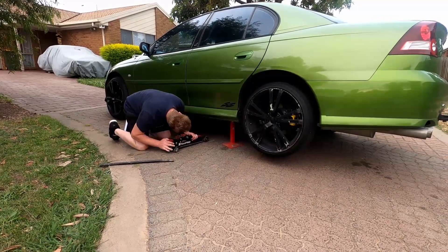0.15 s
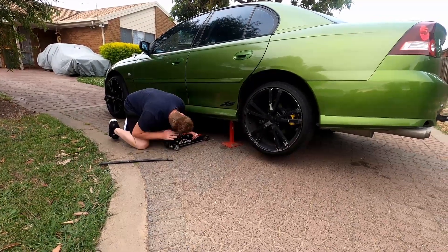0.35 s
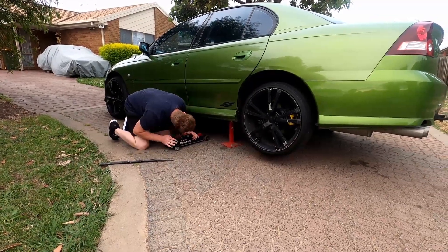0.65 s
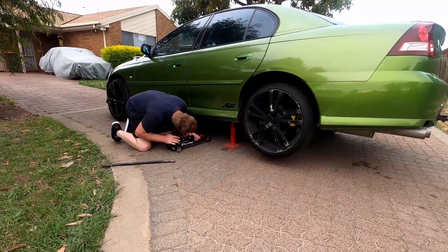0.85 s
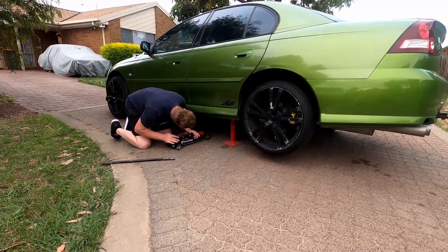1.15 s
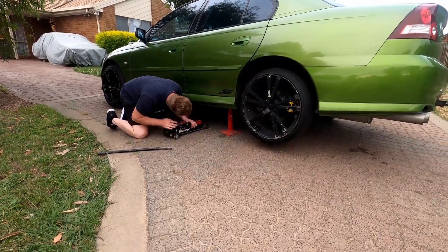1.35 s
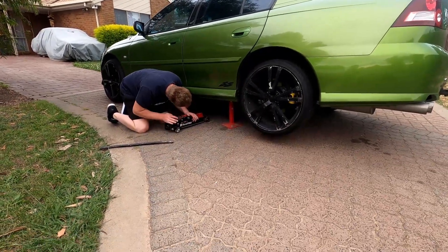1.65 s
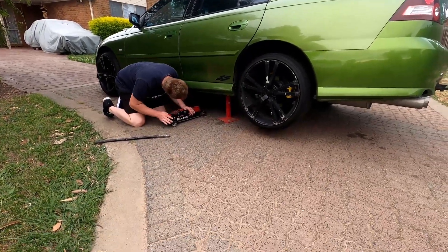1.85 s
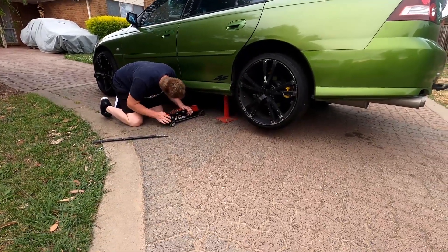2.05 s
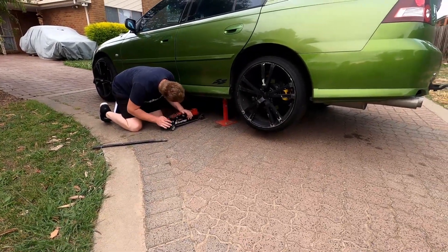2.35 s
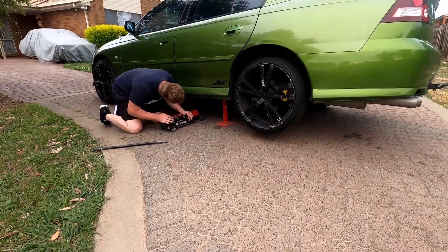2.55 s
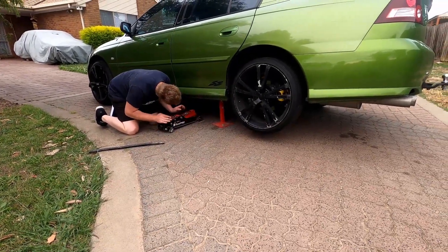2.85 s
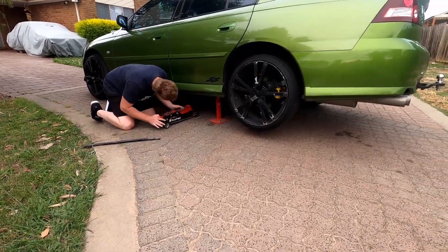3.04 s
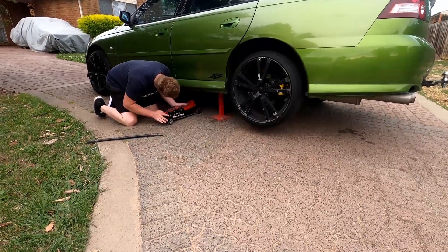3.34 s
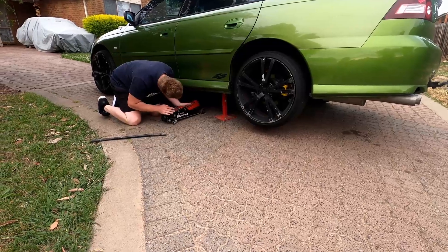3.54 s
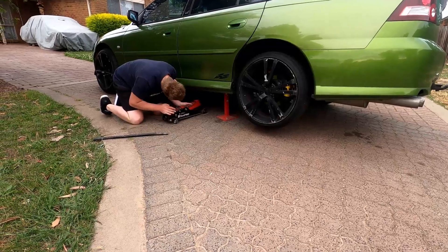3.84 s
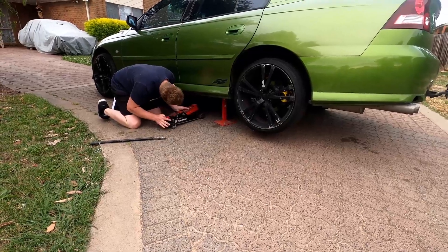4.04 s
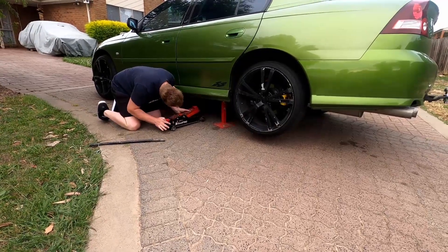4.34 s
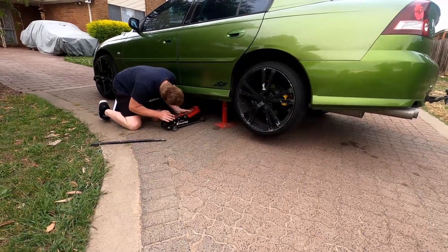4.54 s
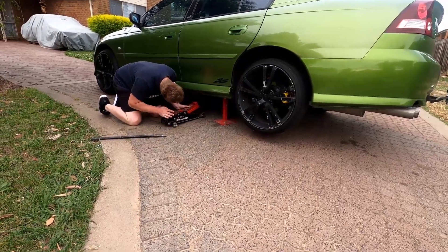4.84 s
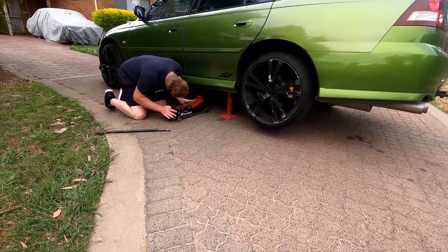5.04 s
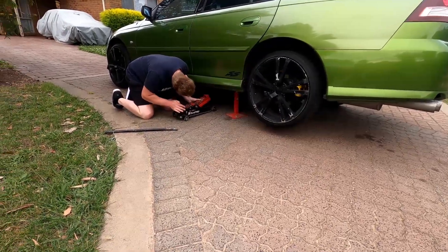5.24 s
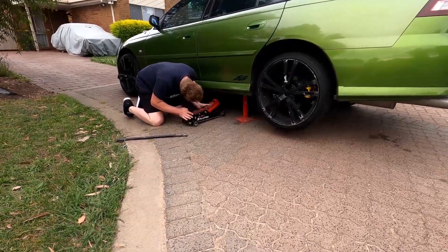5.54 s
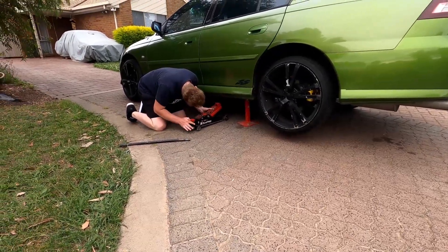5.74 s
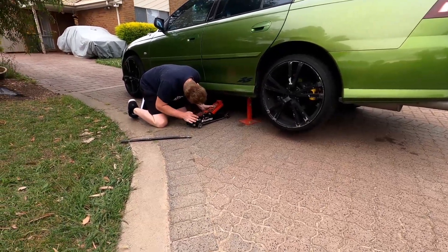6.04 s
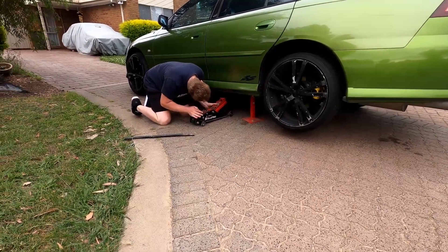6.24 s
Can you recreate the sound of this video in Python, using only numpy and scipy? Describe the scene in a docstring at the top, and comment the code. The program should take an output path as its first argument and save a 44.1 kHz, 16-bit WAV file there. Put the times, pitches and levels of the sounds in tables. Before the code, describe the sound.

Quick metallic knocks and light clicks from a hand-pumped car jack on a driveway, over faint low thumps and air.

```python
"""A paved driveway, beside a car: a small trolley jack is pumped by hand in quick short strokes.
The steel lever knocks at the end of its travel and its loose pins tick in between; the steel rings,
the joints rub and the pump squeaks, amid short gritty scrapes. Paving, car and house throw the sound back.
Underneath lie a few soft low thumps, an engine far off sinking in pitch, and light air on the microphone.
"""
import sys
import numpy as np
from scipy import signal
from scipy.fft import rfft, irfft
from scipy.io import wavfile
from scipy.ndimage import uniform_filter1d

SR = 44100
rng = np.random.default_rng(int(sys.argv[2]) if len(sys.argv) > 2 else 0)


def generate_wav(signal):
    """Clip the signal to [-1, 1] and save it as 16-bit WAV at the path in sys.argv[1]."""
    frames = np.transpose(np.atleast_2d(signal))
    scaled = np.clip(frames, -1, 1) * 32767
    pcm = np.round(scaled).astype(np.int16)
    wavfile.write(sys.argv[1], SR, pcm)


N = 281799
TIME = np.arange(N) / SR


def from_db(db):
    """Decibels to gain."""
    return 10 ** (np.asarray(db) / 20)


def unit(x):
    """Scales to rms 1."""
    return x / np.sqrt(np.mean(x ** 2) + 1e-20)


def read(points, hz, column=1):
    """One column of a table on a log-frequency axis."""
    table = np.transpose(points)
    return np.interp(np.log(hz + 1e-6), np.log(table[0] + 1e-6), table[column])


def add(mix, start, sound):
    """Mixes a sound in at a start time in seconds."""
    part = mix[max(round(start * SR), 0):][:len(sound)]
    part += sound[:len(part)]


def coloured(x, colour):
    """Filters by a (frequency, level) curve and scales to rms 1."""
    return unit(irfft(rfft(x) * from_db(read(colour, np.fft.rfftfreq(len(x), 1 / SR))), len(x)))


def noise(colour, size=N):
    """Noise of rms 1 with the given spectrum."""
    return coloured(rng.standard_normal(size), colour)


def crackle(per_s, spread_db, cap):
    """Sparse random impulses, each boosted by up to cap times spread_db."""
    strength = rng.standard_normal(N) * from_db(spread_db * np.minimum(rng.exponential(1, N), cap))
    return strength * (rng.random(N) < per_s / SR)


def wander(per_s):
    """Random drift of rms 1 that heads for a new value per_s times a second."""
    return unit(np.interp(TIME * per_s, np.arange(2000), rng.standard_normal(2000)))


def swells(rows):
    """Gain over time of smooth swells, each (middle, length, level)."""
    return sum(from_db(db) * np.cos(np.pi * np.clip((TIME - middle) / length, -.5, .5)) ** 2
               for middle, length, db in rows)


def mode(t, hz, t60):
    """A sine that dies by 60 dB in t60 seconds."""
    return np.sin(2 * np.pi * hz * t) * np.exp(-np.log(1000) * t / t60)


def causal(db):
    """Frequency response with this gain that rings only after the blow."""
    log_gain = np.log(from_db(np.r_[db, db[-2:0:-1]]))
    return np.exp(np.conj(signal.hilbert(log_gain)))[:len(db)]


# hush around the driveway, and wind rumble at the microphone: (frequency [Hz], relative level [dB])
HUSH_COLOUR = [(29, -59), (50, 9.5), (70, -4.5), (119, -2), (313, -7), (615, -12.5), (863, -9), (1020, -15),
               (2010, -15.5), (2560, -24), (5150, -26.5), (7570, -27), (9870, -30), (11700, -31),
               (16000, -72)]
RUMBLE_COLOUR = [(8, -4), (16, -28), (28, -7), (45, -15.5), (80, -27), (200, -31), (600, -65)]
# gusts on the microphone: (middle [s], length [s], level [dB])
GUSTS = [(.4, 0.84, -33.5), (1.05, 0.88, -16.5), (1.55, 0.6, -25.5), (2.35, 0.34, -33), (3.1, 0.39, -26.5),
         (3.7, 0.37, -30.5), (4.27, 0.44, -28.5), (4.64, 0.29, -27)]

def open_air(breeze_db=-31.5, sink_db_per_s=0.8, rumble_db=-54.5, hush_db=-58.5):
    """Steady outdoor hush; gusts over a dying breeze sway and rumble at the microphone."""
    wind = from_db(breeze_db - sink_db_per_s * TIME) + swells(GUSTS)
    sway_hz = 4.5 + 2.5 * np.tanh(uniform_filter1d(wander(per_s=6), size=4000))
    sway = wind * np.sin(2 * np.pi * np.cumsum(sway_hz) / SR)
    rumble = from_db(rumble_db) * (wind / from_db(breeze_db)) ** 0.7 * noise(RUMBLE_COLOUR)
    return sway + rumble + from_db(hush_db) * noise(HUSH_COLOUR)


# the far engine's fundamental, as heard from the driveway: (time [s], level [dB])
ENGINE_LEVEL = [(0, -54.5), (.3, -57.5), (.7, -64), (1.4, -53), (2.1, -56), (3.05, -59), (3.7, -67.5),
                (4.4, -64), (5.9, -70.5), (6.39, -71)]

def far_engine(start_hz=144.5, sag_octaves_per_s=.069, octave_db=-72, half_order_db=-17, waver_db=0.9):
    """A far engine slowly winds down; uneven firing adds a weak half order."""
    level_db = np.interp(TIME, *np.transpose(ENGINE_LEVEL))
    phase = 2 * np.pi * np.cumsum(start_hz * 2 ** (-sag_octaves_per_s * TIME)) / SR
    orders = [(1, level_db), (3 / 2, level_db + half_order_db), (2, octave_db)]
    waver = [(1, 0), (6, -4), (30, -40), (100, -100)]  # (frequency [Hz], relative level [dB])
    return np.sqrt(2) * sum(from_db(db + waver_db * noise(waver)) * np.sin(k * phase) for k, db in orders)


# soft low thumps under the work: (time [s], level [dB], pitch [Hz], t60 [s])
THUMPS = [(.235, -43, 93.6, 0.27), (2.269, -60, 57.4, .3), (2.7, -42.5, 66.3, 0.23), (3.639, -40, 61, 0.54),
          (3.974, -43, 60.3, 0.65), (4.771, -38.5, 55.5, 0.57), (5.23, -40.5, 54.6, 0.73),
          (6.161, -42.5, 50.4, 0.4), (6.191, -42, 107.7, 0.41), (6.282, -51, 67, 0.66)]

def thumps(rise_s=0.021, puff_db=-5, puff_decay_s=0.043):
    """A dull push, then a low ring."""
    out, t = np.zeros(N), np.arange(SR) / SR
    puff_colour = [(20, -6), (60, 24), (130, -0.5), (300, -43), (900, -62)]
    for start, db, hz, t60 in THUMPS:
        puff = from_db(puff_db) * noise(puff_colour, size=SR) * np.exp(-t / puff_decay_s)
        add(out, start, from_db(db) * (mode(t, hz, t60) + puff) * (1 - np.exp(-t / rise_s)))
    return out


# the driveway's open-air tail: (frequency [Hz], t60 [s], level [dB])
TAIL = [(193, 0.26, -26), (493, 0.37, 1), (855, 0.093, -2.5), (1440, 0.14, -14.5), (3480, 0.2, -6),
        (6650, 0.16, -8), (10500, 0.097, -18), (15600, 0.11, -26)]
# close reflections off paving and car: (delay [s], level [dB])
ECHOES = [(.0062, -18), (.0105, -15), (0.017, -26), (.0195, -20.5), (.0315, -25.5)]

def driveway(x, build_s=0.0012, size=16384):
    """A few close reflections, smeared by rough surfaces, and a short open-air tail."""
    hz, t, tail = signal.stft(rng.standard_normal(size), SR, nperseg=256)
    decay_s = read(TAIL, hz)[:, None] / np.log(1000)
    tail *= from_db(read(TAIL, hz, column=2))[:, None] * np.exp(-t / decay_s) * np.sqrt(2 / (decay_s * SR))
    response = signal.istft(tail, SR, nperseg=256)[1][:size]
    response *= 1 - np.exp(-np.arange(size) / SR / build_s)
    for delay, db in ECHOES:
        scatter = rng.standard_normal(96) * np.hanning(96)
        add(response, delay, from_db(db) * scatter / np.linalg.norm(scatter))
    return signal.fftconvolve(x, response)[:N]


def alternating_echoes(x, tails=6, crossfade_s=.13):
    """Six random echo tails alternate, so successive blows ring out slightly differently."""
    out = np.zeros(N)
    for tail in range(tails):
        steps_away = abs((TIME / crossfade_s - tail + tails / 2) % tails - tails / 2)
        out += driveway(x * np.cos(np.pi / 2 * np.minimum(steps_away, 1)))
    return out


# scrapes and light touches at the jack: (time [s], length [s], level [dB])
SCRAPES = [(0.144, 0.099, -60.5), (0.272, 0.041, -57), (0.337, 0.014, -55), (0.408, 0.009, -54),
           (0.612, 0.0085, -45), (1.03, 0.093, -73), (1.245, 0.033, -67), (3.431, 0.03, -43),
           (4.147, 0.29, -60.5), (4.46, 0.036, -59), (4.79, 0.098, -56.5), (5.193, 0.0085, -40),
           (5.512, 0.068, -63), (6.265, 0.0069, -44.5)]

def scrapes(frame_colour):
    """Short gritty scrapes, and light touches just before a knock or tick, in the frame's colour."""
    grain = coloured(crackle(per_s=2000, spread_db=3.5, cap=3), frame_colour)
    return sum(from_db(db) * grain * np.sqrt(abs(np.sin(np.pi * np.clip((TIME - start) / length, 0, 1))))
               for start, length, db in SCRAPES)


# faint squeaks at the pump: (time [s], length [s], level [dB])
SQUEAKS = [(0.138, 0.047, -73), (0.21, .028, -72), (0.568, 0.064, -74), (6.13, 0.026, -89)]

def squeaks(from_hz=6100, to_hz=7350):
    """On some strokes the pump gives a short thin squeak that glides upwards."""
    out = np.zeros(N)
    for start, length, db in SQUEAKS:
        hz = np.linspace(from_hz, to_hz, int(length * SR))
        glide = np.sin(2 * np.pi * np.cumsum(hz) / SR)
        add(out, start, from_db(db) * unit(np.hanning(len(hz)) * glide))
    return out


# rubbing in the linkage: (frequency [Hz], relative level [dB])
RUB_COLOUR = [(200, -15), (700, -5), (1800, 7), (3000, -3), (7000, -7), (10000, -8.5), (13000, -9),
              (16000, -15)]
# the joints bind and rub harder: (middle [s], length [s], level [dB])
BINDS = [(1.26, 0.27, -64.5), (3.28, 0.12, -66), (3.8, 0.72, -72.5), (4.23, 0.21, -57), (5.49, 0.22, -67)]

def linkage(clatter, rub_db=-27, settle_s=0.03, clump_db=4.5):
    """Each blow sets the joints sliding: they rub and snag, and settle until the next one."""
    pole = np.exp(-1 / (settle_s * SR))
    power = signal.lfilter([1 - pole], [1, -pole], uniform_filter1d(clatter ** 2, size=1500))
    effort = np.sqrt(abs(power) + 1e-14)
    level = from_db(rub_db) * clatter.std() * unit(effort ** 0.99) + swells(BINDS)
    catches = crackle(per_s=60, spread_db=4, cap=2)
    click = noise(RUB_COLOUR, size=512) * np.exp(-np.arange(512) / 70)
    snags = unit(signal.fftconvolve(catches, click)[:N])
    rub = from_db(clump_db * wander(per_s=70)) * noise(RUB_COLOUR)
    return level * (rub + snags)


# some blows leave one high mode of the steel pinging: (time [s], pitch [Hz], level [dB], t60 [s])
PINGS = [(.249, 6010, -43, .06), (.518, 5920, -51, .11), (.627, 11390, -47, .06), (.877, 5975, -53, .09),
         (1.022, 11320, -42, .04), (3.421, 6080, -61, .4), (3.741, 6100, -57, .42), (4.075, 6000, -53, .11),
         (4.779, 6250, -44, .04), (5.168, 11340, -44, .06), (5.503, 6360, -41, .04),
         (5.871, 6430, -46, .03)]

def pings(rise_s=0.00067, shake_depth=0.88):
    """A single high mode swells and dies away after a blow, shaken by the loose parts around it."""
    out, t = np.zeros(N), np.arange(SR // 2) / SR
    for start, hz, db, t60 in PINGS:
        shake = 1 + shake_depth * wander(per_s=250)[:len(t)]
        add(out, start, from_db(db) * shake * (1 - np.exp(-t / rise_s)) * mode(t, hz, t60))
    return out


# longer modes of the jack's steel: (frequency [Hz], relative level [dB], t60 [s])
STEEL_MODES = [(1118, -28, .06), (3350, -38, .04), (5860, -40, .09), (6005, -36, .11), (9030, -37, .06),
               (11340, -35, .05)]

def steel_ring(impacts):
    """The steel rings on after every blow."""
    t = np.arange(SR // 5) / SR
    response = sum(from_db(db) * unit(mode(t, hz, t60)) for hz, db, t60 in STEEL_MODES)
    return signal.fftconvolve(impacts, response / np.sqrt(len(t)))[:N]


# bands from the body to the top of a blow: (low edge [Hz], high edge [Hz])
BANDS = [(250, 750), (750, 2500), (2500, 6000), (6000, 10000), (10000, 16000)]

def blows(rows, balance, colour, peaks, ring_scale, ring_width_hz, rise_ratio, linger, lead, rebound_db):
    """Each blow is a brief chatter of steel contacts and a few rebounds, coloured by the struck part."""
    size, lead_s, loud_samples = 4096, .005, .012 * SR
    t, hz, out = np.arange(size) / SR - lead_s, np.fft.rfftfreq(size, 1 / SR), np.zeros(N)
    bump = lambda centre, width: 1 / (1 + (2 * (hz - centre) / width) ** 2)
    centres, since_contact = np.sqrt(np.prod(BANDS, axis=1)), np.maximum(t + 0.00034, 0)
    # a faint, few-millisecond swell of noise leads into each blow
    lead_in = lead * (t < 0) * np.exp(np.minimum(t, 0) / .004)
    for start, level_db, decay_s, ring_hz, ring_db, *manner_db in rows:
        fall_s = linger * decay_s
        strike = (1 - np.exp(-since_contact / (rise_ratio * fall_s))) * np.exp(-since_contact / fall_s)
        # the loose lever rebounds at uneven moments, ever weaker
        rebounds = sum((t > at) * np.exp(-abs(t - at) / .002 - at / .04) for at in rng.uniform(.006, .05, 5))
        contacts = rng.standard_normal(size) * np.exp(0.14 * rng.standard_normal(size))
        spectrum = rfft(contacts * (strike / strike.max() + lead_in + from_db(rebound_db) * rebounds))
        # no two blows land on the same spot, so the resonances answer unequally
        peaks_db = sum(db * rng.uniform(.3, 1.5) * bump(centre, width) for centre, width, db in peaks)
        main_ring_db = ring_scale * ring_db * bump(ring_hz, ring_width_hz)
        spectrum *= causal(read(colour, hz) + peaks_db + main_ring_db)
        # the manner of the contact (hardness, thud, weight) shares its energy among the bands
        band_db = level_db + np.dot(balance, [1, *manner_db])
        for _ in range(2):
            energy = np.array([np.sum(abs(spectrum[(hz > lo) & (hz < hi)]) ** 2) for lo, hi in BANDS])
            gain_db = band_db - 10 * np.log10(2 * energy / size / loud_samples)
            spectrum *= causal(read(np.c_[centres, gain_db], hz))
        add(out, start - lead_s, irfft(spectrum))
    return out


# ticks in mid-stroke: (time [s], level [dB], nominal decay [s], ring [Hz], prominence [dB], weight [dB])
TICKS = [(0.0921, -65.5, 0.0051, 11900, 8, 8.5), (0.366, -57, 0.0062, 10350.0, 6, 1),
         (0.5176, -46.5, 0.0037, 5840.0, 1, 4), (0.7482, -53.0, 0.0042, 11500, 10, 0.5),
         (0.8772, -49, 0.0038, 5930, 1, 2.5), (0.891, -57.5, 0.0053, 5800, 16, 6),
         (1.0975, -56, 0.0048, 8550.0, 11, -1), (1.2176, -47.5, 0.0057, 11800, 10, -6),
         (1.3994, -49.5, 0.002, 11290.0, 3, -5.5), (1.505, -48.0, 0.0058, 9300, 7, 1.5),
         (1.7028, -54.5, 0.0011, 11270.0, 6, 0.5), (1.8089, -42.5, 0.0037, 7900, 21, -6),
         (1.9721, -53, 0.0056, 11960.0, 13, -3.5), (2.0773, -45, 0.0031, 9210.0, -1, -1),
         (2.246, -53.5, 0.0034, 12320.0, 3, 0), (2.3527, -46, 0.0037, 12600, 10, 2),
         (2.5527, -53.0, 0.0048, 7550, 3, 0.5), (2.6563, -47.5, 0.0024, 12920.0, -2, 3.5),
         (2.8938, -51, 0.0034, 7350, 12, -3.5), (3.0094, -47.5, 0.0033, 5870.0, -1, 2),
         (3.2137, -53, 0.0031, 7600, 12, -1.5), (3.336, -39, 0.0031, 9140, 17, -5),
         (3.5368, -49.5, 0.0033, 7200, -1, -4.5), (3.6528, -48, 0.0034, 9200, 4, 3),
         (3.8561, -49, 0.0027, 7800, 5, 1), (3.91, -40, 0.0035, 7100, 5, 4),
         (3.9748, -46, 0.0026, 9050, 0, -5), (4.1783, -51.0, 0.0029, 8800, 13, 0),
         (4.2926, -50.5, 0.006, 7000, 9, 2), (4.303, -60, 0.0015, 12500, 8, 0),
         (4.5291, -53.5, 0.005, 7130, 10, 1.5), (4.6671, -46, 0.0041, 13100.0, 8, -0.5),
         (4.8681, -50, 0.0035, 6100, 13, 3), (4.9779, -44.5, 0.0032, 12830.0, -2, -1.5),
         (5.2609, -47, 0.0023, 7500, 9, -1), (5.3957, -43.0, 0.003, 8600, 13, -3.5),
         (5.5986, -49.5, 0.0038, 9000, 11, 0), (5.7156, -48.5, 0.0033, 6300, -8, 4),
         (5.93, -50.5, 0.0032, 8950, 8, -0.5), (6.052, -47.5, 0.0023, 8870.0, 7, 1),
         (6.282, -48.5, 0.0024, 9050, 11, -1)]
# a weightier tick has more body, one row per band: (relative level [dB], change with weight [dB/dB])
TICK_BALANCE = [(-17.5, 1), (-6, 1.3), (-2, 0.93), (0.2, 0), (0.7, 0)]
# broad colour of the pins: (frequency [Hz], relative level [dB])
PIN_COLOUR = [(100, -19), (500, -22), (900, -11.5), (1900, -0.5), (2600, -14), (5000, -7), (7500, 10.5),
              (10000, -1), (12700, -0.5), (13700, -3), (15000, -27), (16000, 11.5)]
# their short resonances: (frequency [Hz], width [Hz], nominal boost [dB])
PIN_PEAKS = [(1185, 76, 14.2), (4150, 74, 1.1), (5827, 230, 11.6), (7334, 320, 12.8), (8000, 440, 10),
             (9050, 690, 12), (10880, 500, 11)]

def pin_ticks():
    """The loose pins take up their play with a small bright tick."""
    return blows(TICKS, TICK_BALANCE, PIN_COLOUR, PIN_PEAKS, ring_scale=1.0, ring_width_hz=470,
                 rise_ratio=0.45, linger=1.17, lead=0.29, rebound_db=-36)


# the lever's knocks, foremost at the microphone:
# (time [s], level [dB], nominal decay [s], ring [Hz], nominal prominence [dB], hardness [dB], thud [dB])
KNOCKS = [(0.167, -50.5, 0.0053, 1420.0, 8, -8, 8), (0.1972, -51.5, 0.0047, 900, 2, -8, 1),
          (0.2451, -33.5, 0.0023, 1790, 6, -0.5, -4), (0.431, -34.5, 0.0031, 1956, 20, -0.5, -1),
          (0.6265, -34.5, 0.0025, 1320, 2, -1, -1.5), (0.811, -43.5, 0.0034, 1980, 15, 3.5, -1),
          (1.0224, -37, 0.0019, 1880, 3, -1.5, -4), (1.0706, -52, 0.005, 1190, -5, 0, 4),
          (1.1674, -48.0, 0.0031, 2070, 13, 0, -8), (1.2339, -45, 0.0041, 1230, 10, -4, -8),
          (1.2903, -36.5, 0.0035, 1920, 8, -1, 3), (1.3388, -51, 0.0066, 1270, 2, 2, 7),
          (1.4513, -40.5, 0.0027, 1950, 12.5, -1, -7), (1.6027, -37, 0.0038, 1820, 2.5, -2, -2),
          (1.7639, -45.5, 0.0044, 1230, 12, 3, -7), (1.821, -45.0, 0.0067, 1140, 10, -4, -4),
          (1.8959, -39.5, 0.0041, 1670, 1, -2, 2), (2.0328, -46, 0.0038, 1960, 5, 6, -3),
          (2.0851, -44.5, 0.0079, 1180, 7, -2, -6), (2.1667, -41, 0.0032, 1820, 3, -2.5, 4),
          (2.3035, -40.5, 0.003, 2130, 10, 2, -3), (2.4678, -42.5, 0.0033, 1160, 5, -3, 2),
          (2.6096, -38, 0.0031, 2000, 17, -2, -8), (2.7744, -42.5, 0.0035, 1190, 9, -1, 4.5),
          (2.9659, -52, 0.0034, 1400, 8, 6, 0), (3.0249, -48.5, 0.004, 1540.0, 1, -7, 0),
          (3.1035, -35.5, 0.0039, 1030, 5, 1.5, 0), (3.173, -51.5, 0.0019, 845, 4, -7, 10.5),
          (3.2759, -41.5, 0.0046, 1740, 11, 4, -1), (3.4213, -36.5, 0.0033, 1610, 12, 0, -1),
          (3.4682, -52.5, 0.0048, 1160.0, 4, -9, 7), (3.5953, -40.5, 0.0029, 1920, 8, 3, -1),
          (3.7411, -37.5, 0.0041, 1150, 12, 0.5, 2), (3.7896, -49.5, 0.0011, 1890, 18, -9, -11),
          (4.067, -35.0, 0.0062, 1120, 6, 2.5, -1), (4.1984, -47, 0.0021, 2360, 16, 1.5, 8),
          (4.2212, -55, 0.0027, 2250, 17, 2, 2), (4.2383, -40, 0.003, 910, 12.5, 1, 4.5),
          (4.4395, -38.0, 0.0052, 1660, 3, 0.5, 2), (4.454, -43, 0.0048, 2210.0, 2, 2.5, -1),
          (4.476, -50, 0.0037, 1300, 10, 1, -6), (4.592, -40, 0.0038, 2040, 6, 2.5, -2),
          (4.7632, -38.5, 0.004, 1590, 2, 1, 2.5), (4.779, -41.5, 0.0054, 2260, 6, 0, -4),
          (4.9263, -42.5, 0.005, 1470, 10, 5, 2), (5.0565, -51.5, 0.0029, 880, 8, -3, -5),
          (5.1662, -36.5, 0.0031, 1610, 8, 1, 0), (5.322, -39.5, 0.0057, 1990, 8, 0, -2),
          (5.486, -29.5, 0.0033, 1590, 10, -1, -2), (5.6582, -42, 0.0038, 1670.0, -2, 5, 3.5),
          (5.8245, -32.5, 0.0033, 1610, 7, 3, -1), (5.912, -46, 0.0015, 2090, 16, -1.5, -9),
          (5.9934, -45.5, 0.004, 1570, -1, 5, -1), (6.1888, -33.5, 0.0026, 1630, 6, -1.5, -2.5),
          (6.2204, -46.5, 0.0032, 2210, 15.5, -0.5, 9), (6.3501, -40.5, 0.0028, 1120, 12, -3.5, -11)]
# a harder knock is brighter and a thud adds body, one row per band:
# (relative level [dB], change with hardness [dB/dB], change with thud [dB/dB])
KNOCK_BALANCE = [(-15, -0.3, 0.96), (-0.5, 0, 0), (-5, .5, 0), (-8.5, 1.5, 0), (-12, 1.4, -0.5)]
# broad colour of the frame: (frequency [Hz], relative level [dB])
FRAME_COLOUR = [(100, -32), (250, -21.5), (420, -6.5), (620, -12), (850, -1.5), (1700, 2.5), (2400, -6.5),
                (4500, -17), (7000, -22), (10000, -26.5), (12500, -23), (13500, -28), (16000, -31)]
# its short resonances: (frequency [Hz], width [Hz], nominal boost [dB])
FRAME_PEAKS = [(1226, 70, 6), (3420, 92, 7.5), (6220, 280, 6.5), (7850, 190, 6.5), (8900, 240, 4.5),
               (11240, 680, 9.5)]

def lever_knocks():
    """The steel lever meets its stop, sounds the frame and rattles back."""
    return blows(KNOCKS, KNOCK_BALANCE, FRAME_COLOUR, FRAME_PEAKS, ring_scale=0.92, ring_width_hz=290,
                 rise_ratio=0.32, linger=1.39, lead=0.09, rebound_db=-13)


def scene():
    """One microphone on the driveway: the jack and its reflections over the low background."""
    impacts = lever_knocks() + pin_ticks()
    clatter = impacts + steel_ring(impacts)
    jack = clatter + pings() + linkage(clatter) + scrapes(FRAME_COLOUR) + squeaks()
    return (jack + alternating_echoes(jack) + thumps() + far_engine() + open_air())[None]


def record(dry):
    """The recorder's band limit."""
    edge_hz = 15850
    lowpass = signal.firwin(301, edge_hz, window=("kaiser", 9), fs=SR)
    return signal.oaconvolve(dry, lowpass[None], "same")


dry = scene()
out = record(dry)
generate_wav(out)
```